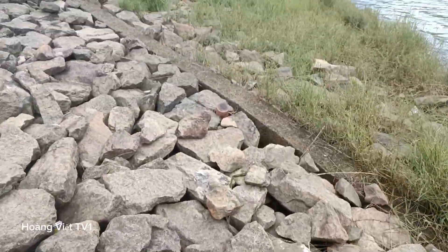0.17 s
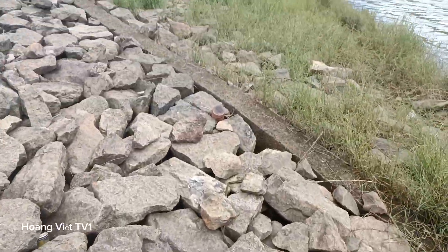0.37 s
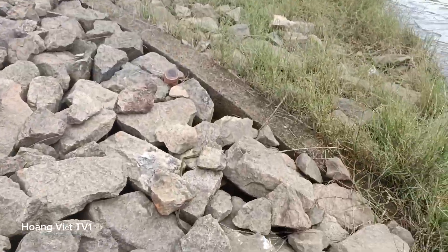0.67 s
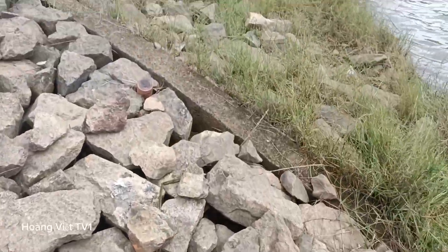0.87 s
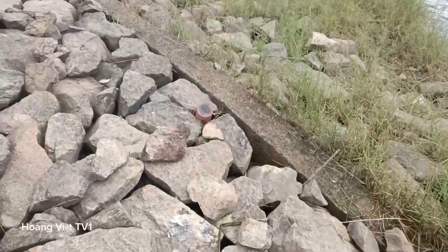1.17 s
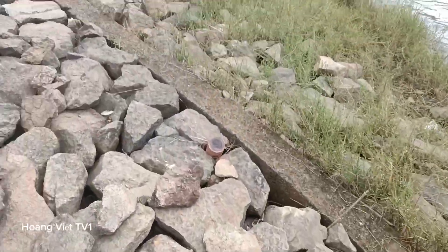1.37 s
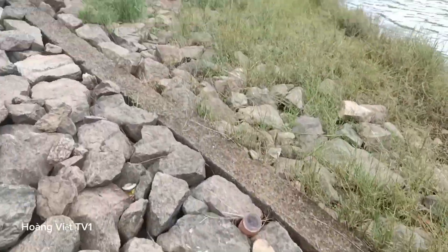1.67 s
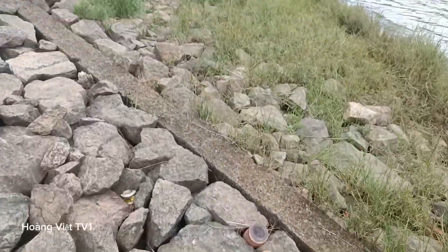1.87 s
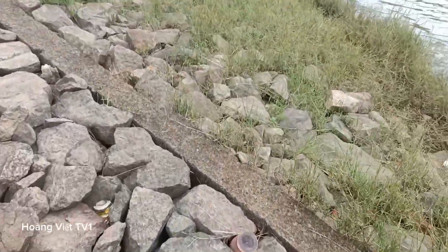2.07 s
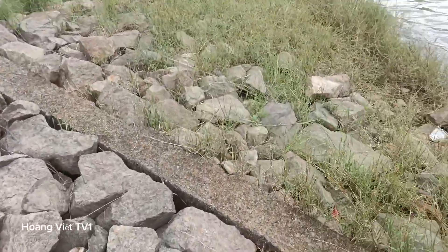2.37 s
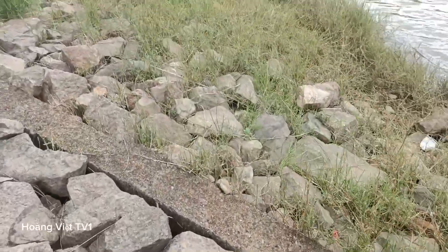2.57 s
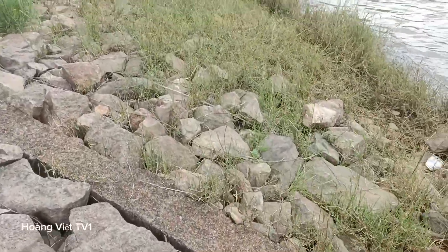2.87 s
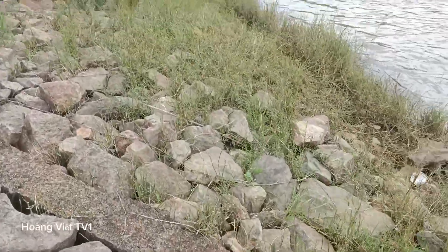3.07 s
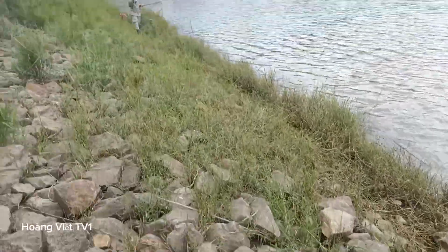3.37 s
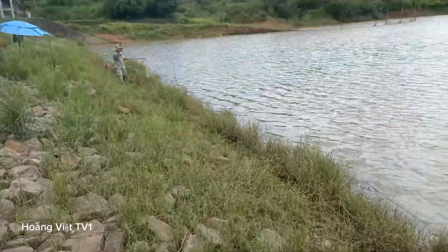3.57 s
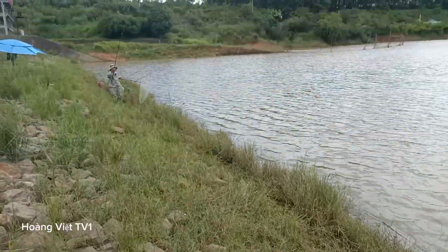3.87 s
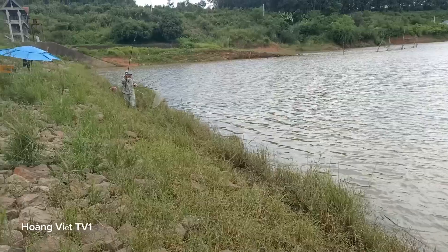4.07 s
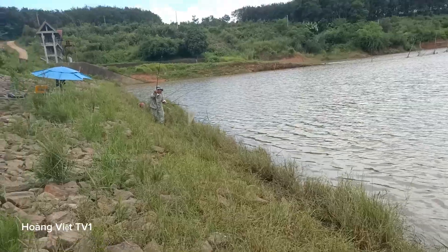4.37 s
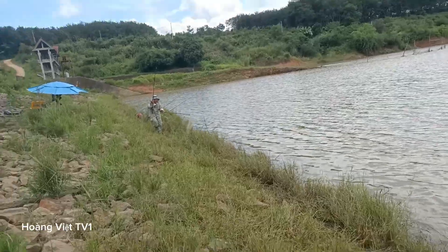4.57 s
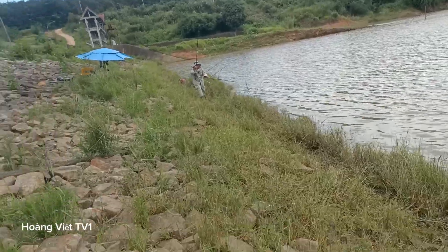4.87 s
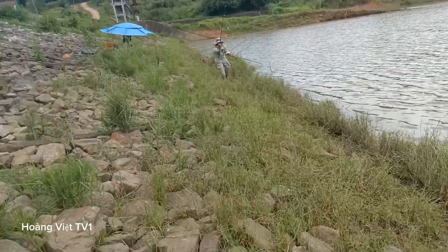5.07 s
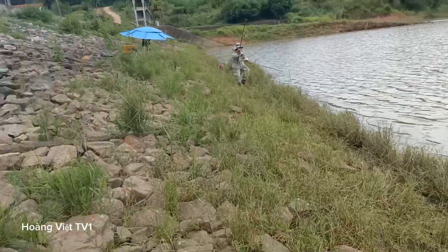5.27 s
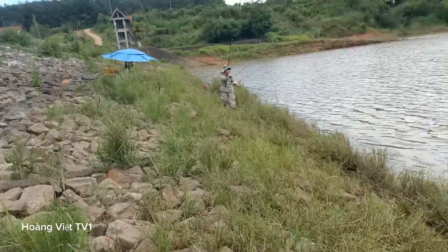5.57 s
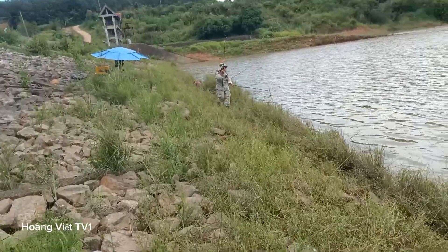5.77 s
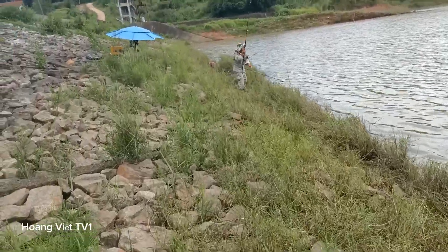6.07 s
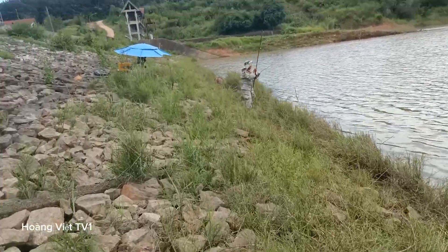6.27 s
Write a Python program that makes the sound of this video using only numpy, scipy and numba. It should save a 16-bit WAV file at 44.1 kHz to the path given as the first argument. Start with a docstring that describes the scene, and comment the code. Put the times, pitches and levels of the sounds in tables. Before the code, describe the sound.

Footsteps clack and knock over loose stones by a lake while cloth rubs the microphone and low wind rumbles, gusting harder late.

```python
"""Someone holding a phone walks over loose riprap beside a lake. From the start cloth strokes the ports as
friction noise, strongest at the right one, over wind turbulence and a wash of filtered noise from the shore.
At the steps chips ping under the sole, stones knock as damped modes and the rubble settles, among brittle
snaps of ringing clicks, most of them grit; all with a diffuse echo. A distant bird's falling sine whistles
come in the middle; then cloth flicks the phone, and late gusts slap the right port with strong eddies."""
import sys
import numpy as np
from scipy import signal
from scipy.fft import rfft
from scipy.io import wavfile
from numba import njit

SR = 44100
rng = np.random.default_rng(int(sys.argv[2]) if len(sys.argv) > 2 else 0)


def wav_out(sig):
    """Save sig, one row per channel (or a flat mono array), as 16-bit PCM at SR to the path in sys.argv[1]."""
    wavfile.write(sys.argv[1], SR, np.round(np.clip(np.atleast_2d(sig).T, -1, 1) * 32767).astype(np.int16))


N = 282901

# colour of cloth noise at the right port, before the port resonance: (frequency [Hz], level [dB])
CLOTH_RIGHT = [(150, -6), (400, -14.5), (1500, -11), (3300, -3.5), (4200, -7), (5100, -12), (6500, -7),
               (8500, -9.5), (11000, -16), (15500, -9.5)]


def undb(db):
    """Level law: decibels to amplitude gain."""
    return 10 ** (np.asarray(db) / 20)


def unit(x):
    """Normalization: scale to rms 1."""
    return x / np.sqrt(np.mean(x ** 2))


def curves(table):
    """Linear interpolation: join table rows over time, one curve per column."""
    s, *columns = np.transpose(table)
    return np.array([np.interp(np.arange(N) / SR, s, c) for c in columns])


def colour(x, points):
    """Spectral shaping: weight x by (frequency [Hz], level [dB]) points, at rms 1."""
    hz, db = np.transpose(points)
    f = np.maximum(np.fft.rfftfreq(N, 1 / SR), 1)
    gain = undb(np.interp(np.log(f), np.log(hz), db))
    return unit(np.fft.irfft(rfft(x) * gain, N))


def band(x, low_hz, high_hz, order=2):
    """Band-pass filtering with a Butterworth response."""
    edges = [low_hz, min(high_hz, .45 * SR)]
    return signal.sosfilt(signal.butter(order, edges, "bandpass", fs=SR, output="sos"), x)


def walk(rate):
    """Bounded random fluctuation: lines join independent values, rate of them per second."""
    knots = rng.uniform(-2.6, 1.97, N // 20)
    return np.interp(np.arange(N) / SR * rate, np.arange(len(knots)), knots)


def fade(t, t60):
    """Exponential damping: 60 dB of decay over t60, in the unit of t."""
    return np.exp(-np.log(1000) * t / t60)


def add(out, s, sound):
    """Superposition: mix a short sound into out at s seconds."""
    i = max(int(s * SR), 0)
    part = sound[..., :max(N - i, 0)]
    out[..., i:i + part.shape[-1]] += part


def knocks(thud_cycles=3.03, clack_pan_db=-5.5, pile_db=-9, pile_ratio=0.7):
    """Impact excites damped modes: a tipping stone thuds on the pile and clacks at its contact."""
    # (time [s], thud peak [dB], thud frequency [Hz], clack peak before panning [dB], mode pitch [ratio])
    impacts = [(0.466, -36, 480, -29, 1.05), (.815, -38, 656, -69, 0.43), (.986, -32, 480, -41, 1.2),
               (1.231, -29.5, 216, -41, 0.9), (1.241, -38, 380, -39, 0.64), (1.256, -32, 276, -35, 0.91),
               (1.2638, -18, 343, -35, 0.77), (1.2825, -31, 323, -33.5, 0.94), (1.2895, -40, 400, -39, 1.2),
               (1.2928, -33, 330, -41, 0.79), (2.159, -25.5, 308, -38, 0.88), (2.1638, -20, 420, -12, 0.8),
               (2.1662, -39, 620, -29, 1.05), (2.169, -19, 278, -45, 1.5), (2.1712, -27, 605, -32, 1.1),
               (2.1859, -25, 316, -23, 0.95), (2.1914, -42, 400, -33, 1.16), (2.257, -43, 520, -44, 1),
               (2.289, -35, 466, -49, 0.68), (2.352, -40, 546, -45, 1.11), (2.9789, -24, 360, -9, 0.99),
               (2.986, -38, 600, -26, 0.71), (2.9892, -14, 474, -20.5, 1.04), (3.438, -32, 333, -59, 0.75),
               (3.4472, -29, 620, -46, 0.68), (3.4535, -35, 476, -47, 1.25), (3.764, -36, 704, -36, 0.9),
               (3.799, -32.5, 686, -36, 0.84), (3.819, -41, 760, -46, 0.51), (4.21, -30.5, 272, -50, 0.66),
               (4.336, -35.5, 314, -56, .6), (4.394, -33.5, 680, -46, 0.9), (4.465, -32, 543, -35.5, 0.59),
               (4.988, -30, 780, -35, 0.55), (5.227, -31, 500, -35.5, .84), (5.249, -38, 450, -40, 1.4),
               (5.2638, -29, 424, -28.5, 0.97), (5.537, -29, 455, -31.5, 0.9), (5.6, -32, 480, -32, 1.02),
               (5.6478, -26.5, 400, -64, 0.6), (6.178, -30.5, 380, -32.5, 0.95),
               (6.188, -38, 418, -32, 0.74), (6.1958, -52, 450, -37, 0.98), (6.2075, -30, 325, -36, 0.73),
               (6.2123, -20, 524, -21.5, 1.12)]
    # modes of a struck stone and the gaps around it, before pitch ratio and detuning:
    # (frequency [Hz], level [dB], t60 [s])
    stone_modes = [(780, 6, .011), (1300, -17, 0.0082), (1546, 7, 0.013), (1813, 14.5, 0.012),
                   (2110, -22, 0.0057), (2760, 1.5, 0.014), (3890, -6.5, 0.016), (4150, -9, 0.0053)]
    out, t = np.zeros((2, N)), np.arange(SR // 12) / SR
    mode_hz, mode_db, mode_t60 = np.transpose(stone_modes)[:, :, None]
    sides = np.array([[1], [-1]])
    contact = 1 - fade(t, .003)
    for s, thud_db, thud_hz, clack_db, pitch in impacts:
        # detuning [ratio] and phase lead [rad] of each mode
        detune, lead = rng.uniform(-1, 1, (2, len(stone_modes))) * [[.02], [.7]]
        # the stone bumps, and the heavier one under it answers lower and longer
        cycles = np.outer([thud_hz, thud_hz * pile_ratio], t)
        bumps = np.sin(2 * np.pi * cycles) * cycles * fade(cycles, thud_cycles)
        thud = undb([0, pile_db]) @ bumps
        ring_hz = mode_hz * pitch * (1 + detune[:, None])
        rings = undb(mode_db) * np.exp(2j * np.pi * ring_hz * t) * fade(t, mode_t60)
        # opposite phase shifts let each mode lead at one port
        clack = (np.exp(1j * sides * lead) @ rings).imag * contact
        clack = undb(clack_db + sides * clack_pan_db / 2) * clack / abs(clack).max()
        add(out, s, undb(thud_db) * thud / abs(thud).max() - clack)
    return out


def scuffs(settle_s=0.12, settle_db=-20.5, settle_pitch_ratio=0.53,
           trickle_s=0.11, trickle_db=-22.5, trickle_hz=4870):
    """Granular impacts: a sole grinds chips, then rubble settles lower and softer and sand trickles."""
    # (time [s], length [s], rms level [dB], central pitch of the chips [Hz])
    footfalls = [(.454, 0.047, -45.5, 1180), (0.742, 0.12, -58, 624), (1.234, 0.067, -43, 456),
                 (1.241, 0.057, -48, 1430), (2.161, 0.012, -36.5, 1710), (2.189, 0.041, -56, 1700),
                 (2.239, 0.052, -59, 2300), (2.306, 0.067, -58, 1080), (2.93, 0.036, -49.5, 556),
                 (2.945, 0.023, -55, 2010), (2.978, 0.021, -43, 1960), (3.43, 0.03, -48.5, 694),
                 (3.443, 0.01, -53.5, 3100), (3.494, 0.041, -52, 440), (3.764, 0.087, -60.5, 1680),
                 (4.206, 0.13, -51.5, 398), (5.234, 0.046, -55.5, 1570), (5.532, 0.015, -46, 1690),
                 (5.593, 0.022, -50.5, 1680), (6.173, .06, -48, 1160), (6.267, .11, -46.5, 533)]
    out = np.zeros((2, N))
    for s, length, db, hz in footfalls:
        add(out, s, undb(db) * chips(length, hz))
        add(out, s + length, undb(db + settle_db) * chips(settle_s, hz * settle_pitch_ratio))
        add(out, s + length, undb(db + trickle_db) * chips(trickle_s, trickle_hz))
    return out


def chips(length, hz, count=60, pitch_spread=0.49, size_db=3, small_chip_db=-2.0,
          grain_cycles=7, port_spread=0.75):
    """Superposed damped pings: many small chips roll and tap, the higher ones softer; at rms 1."""
    t = np.arange(SR // 40) / SR
    when, chance = rng.beta(2, 2, 80)[:count], rng.standard_normal((80, 4))[:count]
    burst = np.zeros((2, int(length * SR) + len(t)))
    for u, (pitch, size, left, right) in zip(when, chance):
        cycles = min(hz * np.exp(pitch_spread * pitch), SR / 3) * t
        port_gains = 1 + port_spread * np.array([[left], [right]])
        ping = np.sin(2 * np.pi * cycles) * fade(cycles, grain_cycles)
        add(burst, u * length, undb(size_db * size + small_chip_db * pitch) * port_gains * ping)
    return unit(burst)


def brittle_snaps(port_ring_db=-6, shared=0.17, spread=1.02, crackle=.3):
    """Brittle fracture and contact: a short burst of clicks excites a narrow ring and a broader crack."""
    # most are grit under a sole, a few are contact at the phone: (time [s], rms before panning [dB],
    # pitch [Hz], length [s], left minus right [dB], gain of the halved crack against the ring [dB])
    snaps = [(0.476, -39.5, 7000, 0.01, 2, -1), (0.654, -35.5, 3630, 0.0049, -4, 6),
             (0.685, -42, 6350, 0.0045, -15, -29), (1.788, -40, 15760, 0.0038, -5, -10),
             (1.973, -44.5, 5960, 0.0062, -3, -8), (2.163, -42, 6100, 0.004, -5, -2),
             (2.203, -47, 6850, 0.0071, -6, -11), (2.244, -50, 6760, 0.01, -9, -4),
             (2.265, -37, 6240, 0.0045, -3, -8), (2.28, -49, 6550, 0.0097, 6, -17),
             (2.22, -51, 6800, 0.007, -3, -12), (2.313, -52, 7100, .005, -2, -16),
             (2.343, -52, 6700, .002, -3, 0), (2.392, -51.5, 6700, 0.0079, 6, -26),
             (2.636, -50.5, 5880, 0.0079, -6, -16), (2.873, -48, 3530, 0.002, -10, -9),
             (2.978, -46.5, 6000, 0.007, -2, -10), (3.022, -48, 6040, 0.0039, 2, -3),
             (3.442, -51.5, 3190, 0.0091, -12, -23), (3.594, -51.5, 6070, 0.013, -2, -16),
             (3.765, -50.5, 3480, 0.0056, 3, -5), (3.796, -52.5, 3360, 0.0067, -2, -14),
             (4.4528, -30.5, 3200, 0.00057, -12, 10), (5.071, -46.5, 2450, 0.0042, 3, -8),
             (5.2165, -45, 6840, 0.0026, 6, -23), (5.27, -35, 6300, 0.0043, 6, -3),
             (5.285, -41, 6930, 0.016, 2, -8), (5.53, -44.5, 2860, 0.017, -1, 13),
             (5.7155, -41.5, 3940, 0.0054, -4, -9), (6.212, -36, 5760, 0.0036, 1, 3),
             (6.217, -49, 7200, .006, 3, -10), (6.33, -47, 3820, .005, -6, -22),
             (6.343, -45, 3760, 0.0097, -5.5, -25)]
    out, t = np.zeros((2, N)), np.arange(SR // 16) / SR
    for s, db, hz, length, pan_db, crack_db in snaps:
        chance = rng.standard_normal((4, len(t)))
        envelope = t * np.exp(-5 * t / length)
        clicks = (chance[:2] + shared * chance[2]) * np.exp(crackle * chance[3]) * envelope
        ring = band(clicks, hz / spread, hz * spread, order=1)
        crack = band(clicks, 1100, 4700, order=1) / 2
        # the right port rings at the very top
        crack[1] += undb(port_ring_db) * band(clicks[1], 13000, 16000)
        snap = ring + undb(crack_db) * crack
        rms = np.sqrt(np.mean(snap[:, :int(length * SR)] ** 2))
        add(out, s, undb(db + np.array([[pan_db], [-pan_db]]) / 2) * snap / rms)
    return out


def scatter(x, wet_db=-15, t60=0.067):
    """Diffuse reflection: surrounding boulders return a brief echo as decaying noise."""
    t = np.arange(SR // 5) / SR
    echo = rng.standard_normal((2, len(t))) * fade(t, t60) * (1 - fade(t, 0.052))
    echo /= np.sqrt(np.sum(echo ** 2, axis=1, keepdims=True))
    return x + undb(wet_db) * signal.fftconvolve(x, echo, axes=1)[:, :N]


def rubbing(judder_db=0.9, sway_db=1.5, edge_flicker_db=2, shared=0.08, left_db=-1, right_db=-2.0):
    """Sliding friction: cloth noise crosses both ports while its pressure sways and judders."""
    # colour at the left port, before the port resonance: (frequency [Hz], level [dB])
    cloth_left = [(150, -3), (400, -1), (1500, -6.5), (3200, -1), (4200, -5), (5100, -10), (6900, -6.5),
                  (8500, -8.5), (11000, -12.5), (15500, -13)]
    slips = fibres()
    (at_left, at_right), at_rasp, at_edge, pitch = strokes()
    left = at_left * port(colour(slips[0] + shared * slips[2], cloth_left), pitch) * undb(left_db)
    right = at_right * port(colour(slips[1] + shared * slips[2], CLOTH_RIGHT), pitch)
    whistle = unit(band(slips[2], 14200, 16000, order=1))
    edge = at_edge * whistle * undb(edge_flicker_db * walk(140))
    right = (right + edge) * undb(right_db)
    pressure = undb(judder_db * walk(160) + sway_db * walk(30))
    return (np.array([left, right]) + at_rasp * rasp()) * pressure


def strokes(attack_s=0.0012):
    """Friction rises with speed: gains of cloth, rasp and edge, and port pitch, through touch and slip."""
    # (time [s], length [s], right-port level before trim and sway [dB], left minus right before trim [dB],
    # edge whistle and rasp gain relative to the stroke [dB], rise [dB], release t60 [s],
    # port resonance pitch before blending [ratio])
    brushes = [(0, 0.066, -35, -5, 1.5, -7, 5, 0.76, 0.99),
               (0.101, 0.032, -27, -5.5, -1.5, -17, 6, 0.26, 1),
               (.19, 0.075, -38.5, -6, -4, -8, 1, 2.8, 0.98),
               (0.295, 0.059, -30.5, -7, -2.5, -27, 7, 0.93, 1.02),
               (0.408, 0.068, -32, -5.5, -1, -5, 10, 0.44, 1),
               (0.532, 0.13, -38, -6.5, -11, -2.5, 4, 0.63, 1),
               (0.951, 0.054, -33.5, -4, 6, -4, 6.5, 0.11, 1.02),
               (1.028, 0.022, -49, -6, -2, -2.5, 0.33, 2.6, 0.96),
               (1.45, 0.096, -40, -6, -7.5, 1, 10, 0.82, 0.9), (2.239, 0.04, -51.5, -5, -8, 2, -13, 1.6, 1),
               (4.466, 0.054, -31.5, -20, -14, 1.5, -5.5, 0.23, 0.92),
               (4.575, 0.023, -38.5, -15, -7, 1, 4, 0.7, 0.95),
               (4.658, 0.068, -39.5, -9.5, -1, 1.5, 15, 1.1, 1.12),
               (4.809, 0.065, -27, -13, 4.5, -32, 17, 0.05, 1),
               (4.887, 0.08, -40.5, -6.5, -3, -9, 3.5, 0.32, 1.07),
               (4.984, 0.021, -32.5, -13, -5, -2, 8, 0.1, 0.99),
               (5.532, 0.053, -45.5, -12, -3, 5, 3, 0.32, 1.12),
               (5.625, 0.078, -42.5, -7.5, -3, -7, 8.5, 0.66, 1.06),
               (5.755, 0.074, -40.5, -8, 1, -6, 7, 0.12, 1.06),
               (6.166, 0.16, -51.5, 1, 0, 6, 1, 0.77, 1.04)]
    # constant faint rustle before trim and sway: left, right [dB]
    rest_db = (-56.5, -53.5)
    t = np.arange(N) / SR
    power, shift = np.zeros((5, N)), np.zeros(N)
    power[:2] += undb(rest_db)[:, None] ** 2
    for s, length, db, pan_db, edge_db, rasp_db, rise_db, t60, pitch in brushes:
        touch = np.clip((t - s) / attack_s, 0, 1)
        swell = undb(-rise_db * np.clip(1 - (t - s) / length, 0, 1))
        release = fade(np.maximum(t - s - length, 0), t60)
        gains = undb(db + np.array([pan_db, 0, pan_db + rasp_db, rasp_db, edge_db]))
        stroke = np.outer(gains ** 2, (touch * swell * release) ** 2)
        power += stroke
        shift += (pitch - 1) * stroke[1]
    # power at the right port weights the pitch of overlapping strokes
    return np.sqrt(power[:2]), np.sqrt(power[2:4]), np.sqrt(power[4]), 1 + shift / power[1]


def fibres(grain_db=1.0, snaps_per_s=170, snap_size=3.9, snap_t60=0.00083):
    """Stick-slip noise: three streams of dense tiny slips, with louder ticks as threads snap free."""
    catches = np.minimum(rng.exponential(size=(3, N // 16 + 1)), 5)
    grain = undb(grain_db * np.repeat(catches, 16, axis=1)[:, :N])
    snaps = (rng.random((3, N)) < snaps_per_s / SR) * rng.random((3, N))
    ticks = signal.lfilter([snap_size], [1, -fade(1 / SR, snap_t60)], snaps)
    return rng.standard_normal((3, N)) * (grain + ticks)


def rasp(snags_per_s=1300, level_db=-7.0):
    """Random impulses: coarse threads snag on the case in sparser, lower clicks."""
    # (frequency [Hz], level [dB])
    rasp_colour = [(150, 3), (500, 2.5), (800, 2), (1400, 1), (2300, 3), (3400, 3.5), (4200, 1.5),
                   (5200, -15), (6500, -22), (9000, -32), (15500, -35)]
    snags = (rng.random((2, N)) < snags_per_s / SR) * rng.standard_normal((2, N))
    return undb(level_db) * np.array([colour(side, rasp_colour) for side in snags])


def port(x, pitch, hz=6600, width_hz=1100, boost_db=5.5):
    """Air resonance: a port's resonant band adds to x, its pitch moved by the covering cloth."""
    return unit(x + undb(boost_db) * resonate(x, hz * pitch, float(width_hz)))


@njit
def resonate(x, hz, width):
    """Second-order resonance: a state-variable band-pass with a moving centre, gain 1 there."""
    y, b, low = np.empty(len(x)), 0., 0.
    for i in range(len(x)):
        g, k = np.tan(np.pi * hz[i] / SR), width / hz[i]
        v = (b + g * (x[i] - low)) / (1 + g * (g + k))
        b, low, y[i] = 2 * v - b, low + 2 * g * v, k * v
    return y


def flicks(t60=0.0028, attack_s=0.00019):
    """Brief contact noise: a fold of cloth flicks the phone, a sharp crack strongest at the right port."""
    # (time [s], right-port envelope peak [dB], left minus right [dB])
    folds = [(4.463, -30, -14), (4.4665, -20, -17), (4.4696, -14, -34)]
    out, t = np.zeros((2, N)), np.arange(SR // 50) / SR
    shape = (1 - np.exp(-t / attack_s)) * fade(t, t60)
    for s, db, pan_db in folds:
        add(out, s, undb([[db + pan_db], [db]]) * shape / shape.max())
    noise = [port(colour(rng.standard_normal(N), CLOTH_RIGHT), np.ones(N)) for _ in range(2)]
    return out * np.array(noise)


def shell(x):
    """Structural resonance: sound entering through the phone's body rings its shell and ports."""
    # (frequency [Hz], width [Hz], added gain [dB])
    shell_modes = [(3760, 25, -4), (5750, 40, -5), (6280, 17, -5.5), (7170, 48, -10), (7400, 100, 0)]
    return x + sum(undb(db) * band(x, hz - width / 2, hz + width / 2, order=1)
                   for hz, width, db in shell_modes)


def wind(breeze_gain_db=5.5, gust_db=2.0, flutter_db=-35.0, flutter_growth=2.38,
         swell_db=-36, swell_growth=0.71):
    """Turbulent pressure, separate at each port: fine flutter grows fastest with gusts, deep swell least."""
    # strength over both ports before breeze_gain_db: (time [s], level [dB])
    breeze = [(0.0, -38), (0.18, -46.5), (0.21, -33.5), (0.71, -37), (1.16, -49.5), (1.21, -36.5),
              (1.3, -46.5), (1.87, -34.5), (2.32, -41.5), (2.55, -50.5), (3.8, -51), (3.84, -38),
              (4.02, -45), (4.42, -38.5), (4.52, -32.5), (4.8, -38), (4.96, -32), (5.0, -42.5), (5.1, -25),
              (5.48, -29.5), (5.57, -35.5), (5.66, -28.5), (5.71, -44.5), (6.41, -34.5)]
    # exposure of the ports, before the growth factors: (time [s], left minus right [dB])
    windward = [(0.0, -8), (0.18, -1.5), (0.39, -2), (1.0, 0), (1.5, -18.5), (2.45, 8), (4.6, -11.5),
                (5.03, -11), (5.57, 4), (5.66, -19), (5.73, 2), (6.32, 0), (6.41, 9.5)]
    # spectra of the turbulence: (frequency [Hz], level [dB])
    low_colour = [(20, -20), (45, 2), (70, 0.5), (110, -6.5), (170, -17), (300, -29), (700, -42),
                  (4000, -74)]
    flutter_colour = [(50, -1), (80, 2), (130, 4), (180, 4), (300, -7), (450, -16.5), (650, -38),
                      (1200, -31), (5000, -50)]
    swell_colour = [(12, -12), (25, 4), (38, -2), (55, -8.5), (100, -35), (300, -81)]
    out, windward_db = [], curves(windward)[0]
    for side in (1, -1):
        shelter_db = 10 * np.log10(1 + undb(-side * windward_db) ** 2)
        db = curves(breeze)[0] + breeze_gain_db - shelter_db
        low = colour(rng.standard_normal(N), low_colour) * undb(db + gust_db * walk(12))
        excess_db = db + 27 + .9 * walk(25)
        flutter_gain = undb(flutter_db + flutter_growth * excess_db)
        flutter = colour(rng.standard_normal(N), flutter_colour) * flutter_gain
        swell_gain = undb(swell_db + swell_growth * excess_db)
        swell = colour(rng.standard_normal(N), swell_colour) * swell_gain
        out.append(swell + low + flutter)
    # the ports round off the strongest swings of pressure
    return .3 * np.tanh(np.array(out) / .3)


def eddies(left_db=-18, wobble=0.22):
    """Vortex passage: an eddy crosses the right port as a few uneven swings of pressure."""
    # (time [s], right-port envelope peak [dB], nominal frequency before wobble [Hz], length [s])
    slaps = [(0.566, -19.5, 63, 0.024), (.745, -30, 158, 0.036), (.8, -30.5, 115, 0.049),
             (1.62, -35.5, 137, .045), (1.72, -30, 184, 0.034), (1.8, -29.5, 155, 0.036),
             (1.899, -30.5, 120, 0.028), (1.96, -31, 112, 0.062), (4.945, -11, 74.4, 0.026),
             (5.066, -21, 174, 0.022), (5.092, -16, 165, 0.014), (5.133, -16.5, 204.4, 0.055),
             (5.147, -20, 370, 0.029), (5.211, -12.5, 107, 0.011), (5.311, -9, 94, 0.027),
             (5.336, -26, 147, 0.058), (5.37, -16.5, 67, 0.17), (5.639, -12.5, 155.4, 0.033),
             (5.646, -20, 281, 0.017)]
    out = np.zeros((2, N))
    for s, db, hz, length in slaps:
        count = int(length * SR)
        speed = hz * (1 + wobble * walk(317.5)[:count])
        swing = -np.sin(2 * np.pi * np.cumsum(speed) / SR) * np.hanning(count)
        add(out, s, undb([[db + left_db], [db]]) * swing)
    return out


def shore(level_db=-46, shared=0.67):
    """Partly correlated noise: ripples and grass make a soft wash that swells a little."""
    # (frequency [Hz], relative spectral density [dB per Hz])
    shore_colour = [(30, 11.5), (100, -2), (200, -4), (350, -8), (550, -10.5), (1000, -15.5), (2000, -19.5),
                    (3500, -20), (4300, -23), (5200, -34), (6900, -31.5), (8500, -42), (11500, -34),
                    (15500, -32.5)]
    common = rng.standard_normal(N)
    wash = [colour(rng.standard_normal(N) + shared * common, shore_colour) for _ in range(2)]
    swell_db = .5 * walk(4) + .5 * walk(23)
    return np.array(wash) * undb(level_db + swell_db)


def bird(waver=0.0082):
    """Frequency modulation: thin whistles waver and fall, half of them levelling off."""
    # (time [s], length [s], start and end before waver [Hz], bend [power], level before flicker [dB])
    whistles = [(2.455, .048, 4550, 3620, 1.4, -59), (2.497, .042, 3660, 3430, 1.1, -58),
                (3.771, .022, 4750, 4250, 1.2, -58), (3.915, .018, 5600, 4850, 1, -65),
                (3.929, .035, 4900, 4220, 1.3, -57.5), (4.068, .026, 4400, 4150, 1, -62),
                (4.102, .026, 4550, 4200, 1, -63), (4.232, .042, 4350, 4200, 1, -63)]
    out = np.zeros((2, N))
    for s, length, start_hz, end_hz, bend, db in whistles:
        u = np.linspace(0, 1, int(length * SR))
        glide = end_hz + (start_hz - end_hz) * (1 - u) ** bend
        hz = glide * (1 + waver * walk(133)[:len(u)])
        level = undb(db + 2 * walk(150)[:len(u)]) * np.sqrt(np.abs(np.sin(np.pi * u)))
        add(out, s, level * np.sin(2 * np.pi * np.cumsum(hz) / SR))
    return out


def scene():
    """Superposition of steps and snaps among the boulders, noises at the phone and the shore behind."""
    steps = scatter(knocks() + scuffs() + brittle_snaps())
    return steps + shell(rubbing() + flicks()) + wind() + eddies() + shore() + bird()


def record(dry):
    """Low-pass filtering: the phone cuts the top with a steep elliptic response."""
    top_hz = 15550
    return signal.sosfilt(signal.ellip(10, .2, 70, top_hz, fs=SR, output="sos"), dry)


dry = scene()
out = record(dry)
wav_out(out)
```